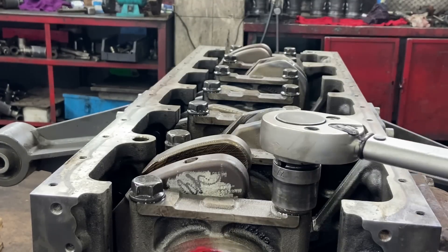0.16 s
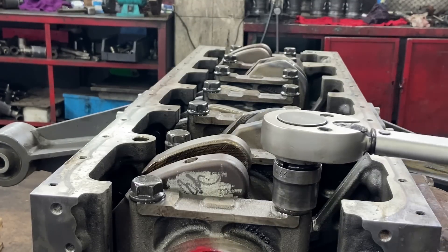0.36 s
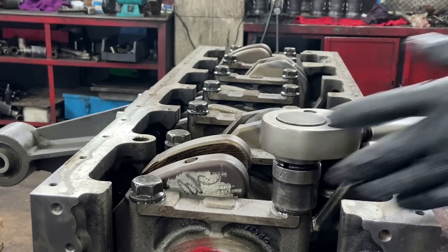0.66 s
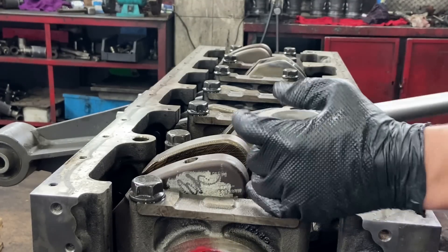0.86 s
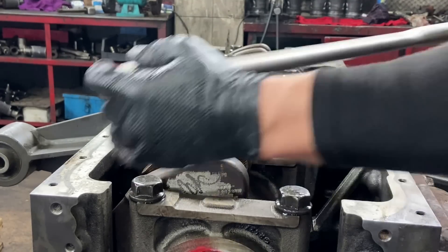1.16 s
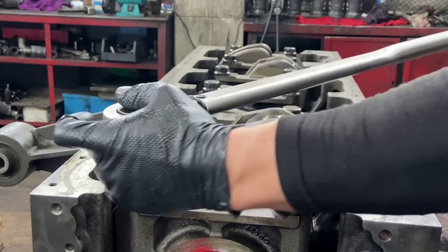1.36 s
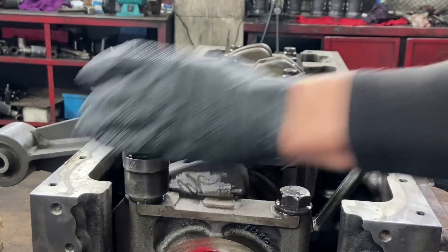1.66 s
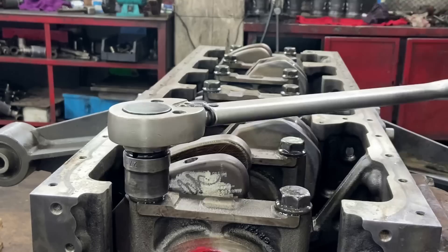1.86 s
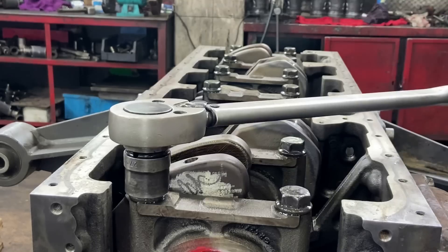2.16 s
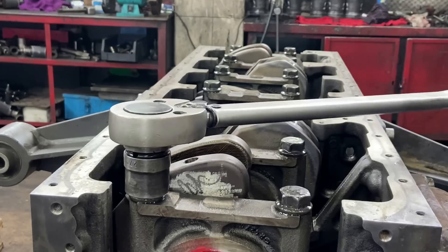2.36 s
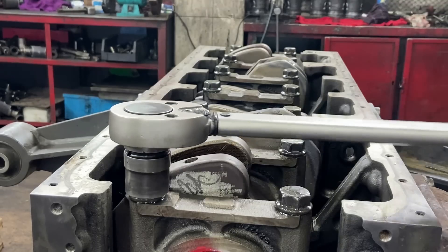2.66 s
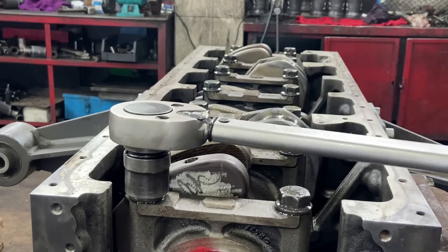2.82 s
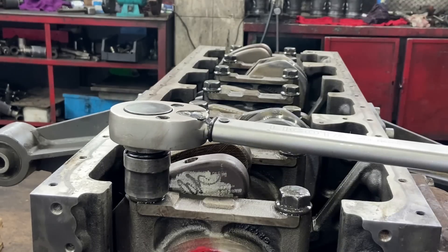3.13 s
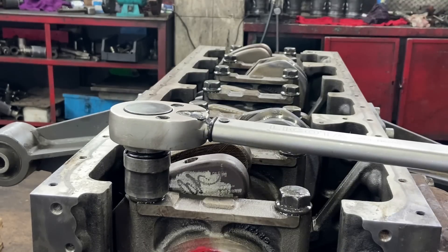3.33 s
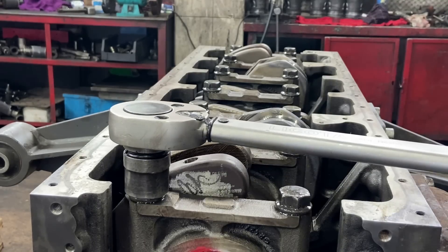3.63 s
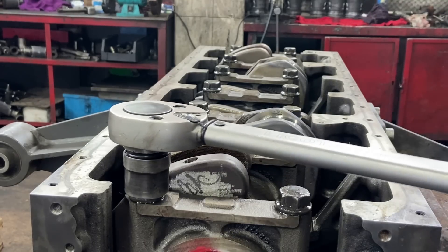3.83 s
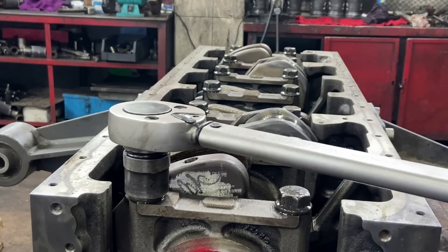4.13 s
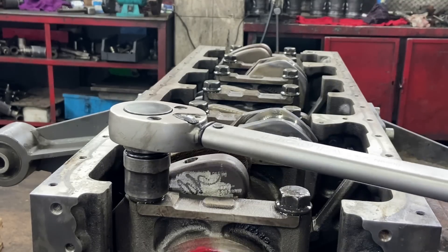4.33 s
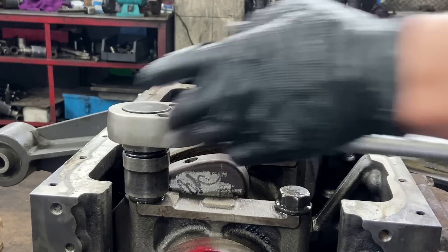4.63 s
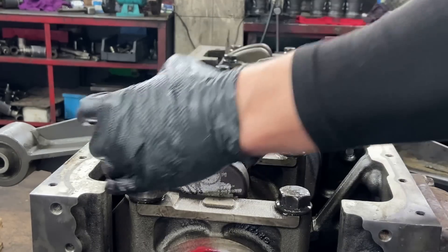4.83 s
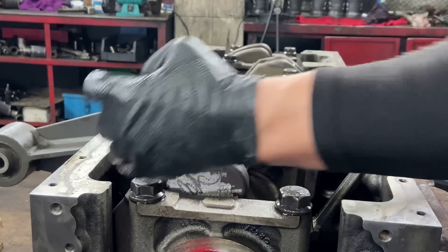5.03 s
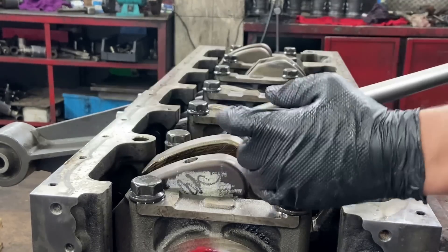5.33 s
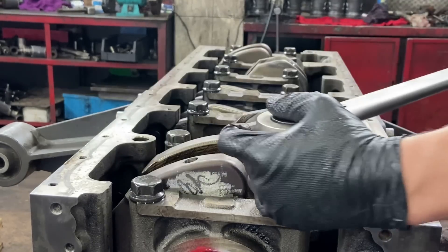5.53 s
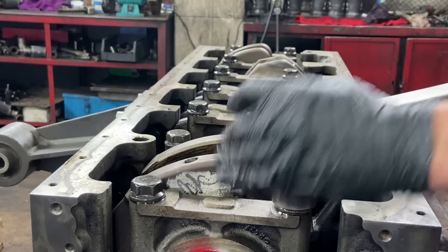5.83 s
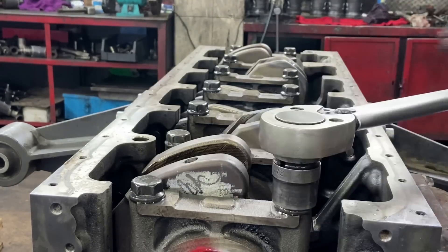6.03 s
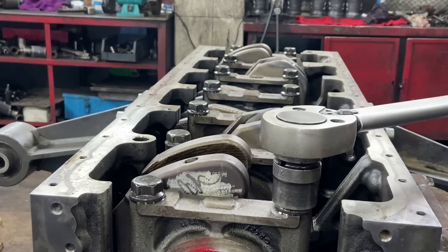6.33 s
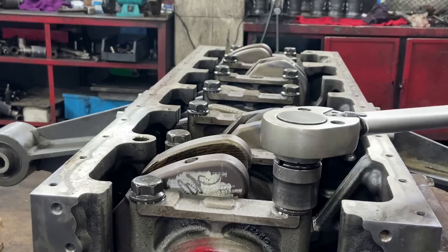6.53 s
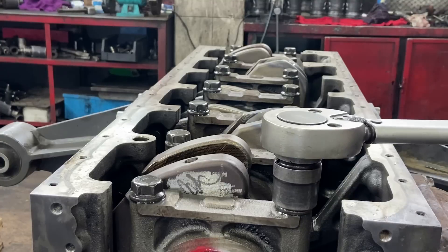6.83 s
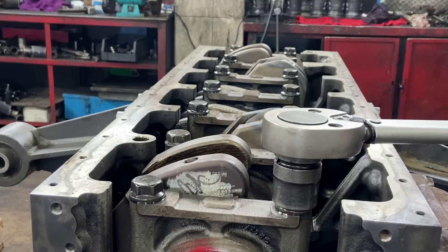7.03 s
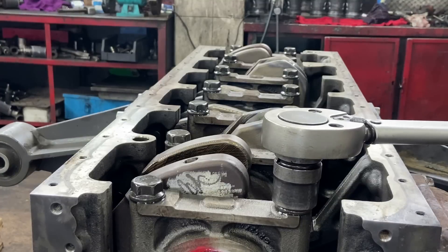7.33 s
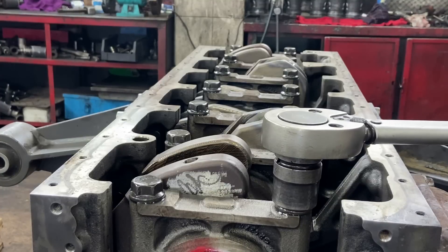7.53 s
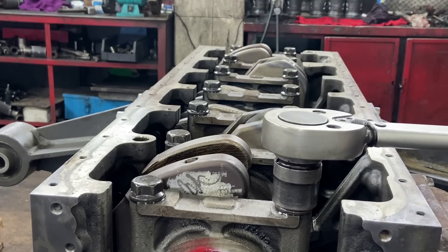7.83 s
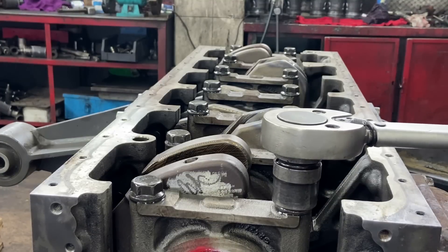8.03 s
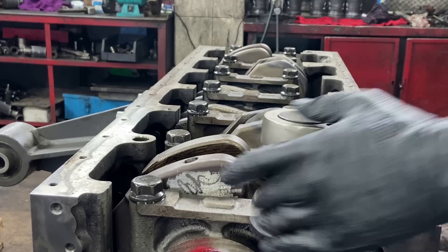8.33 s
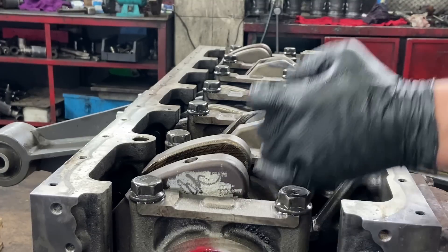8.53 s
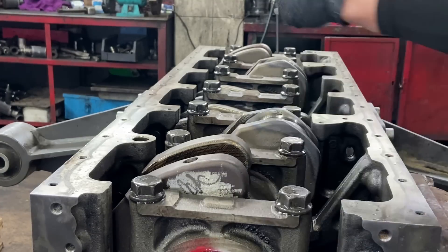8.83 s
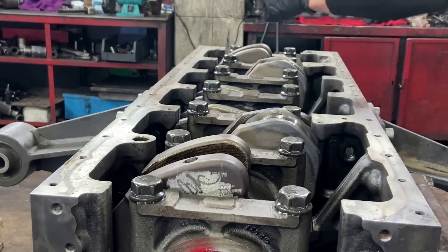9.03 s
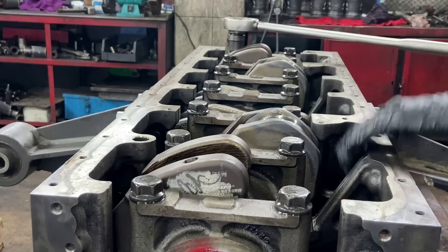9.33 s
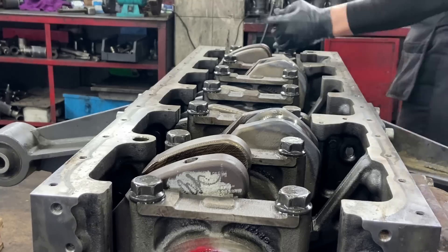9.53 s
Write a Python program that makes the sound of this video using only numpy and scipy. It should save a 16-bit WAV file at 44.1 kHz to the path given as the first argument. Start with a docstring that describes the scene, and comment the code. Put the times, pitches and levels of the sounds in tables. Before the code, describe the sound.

A close, reverberant workshop with low drone and faint hiss. A soft rub opens, then crisp double ratchet ticks at 0.4, 0.55 and 0.75 s. Glove rustle leads to a solid socket clank at 1.25 s, with quick fading bounces and another knock. Quiet handling follows; small dull thumps and scrapes near 3.1 s. The wrench breaks over with a very loud steel clack at 3.85 s and snaps back at 4.2 s, echoes swelling after each. Ratchet ticks and rubs from 4.6 s, a second bouncing socket clank at 5.3 s, lighter knocks to 5.55 s. Near quiet, then block thumps at 7.1, 7.4 and 7.5 s, the strongest with a high steel ping. Louder clacks hit at 7.75 and 8.1 s. Ticks at 8.5 s, a quickening, dulling ratchet spin from 8.7 s with rubbing. At 9.06 s it cuts abruptly to thin air with bright light ticks, clustered around 9.1 and 9.45-9.65 s.

```python
"""Torque wrench on an engine block

A torque wrench tightens two bearing-cap bolts of an engine block in a workshop, close to the microphone.
For each bolt the socket drops on and bounces, the ratchet ticks, the wrench breaks over and snaps back.
Each blow is a short noise burst, coloured by the part it rings; glove rubs, air and a low drone lie around it.
The loud clicks knock the recorder's gain down, so the workshop's echo swells as the gain returns.
At CUT_S the scene cuts to another, thinner one: bright light ticks over thin air."""
import sys
import numpy as np
from scipy import signal
from scipy.fft import rfft, irfft, next_fast_len
from scipy.io import wavfile
from scipy.ndimage import uniform_filter1d

SR = 44100
rng = np.random.default_rng(int(sys.argv[2]) if len(sys.argv) > 2 else 0)


def persist_wave(psi):
    """Save psi, clipped to +-1, as 16-bit WAV."""
    counts = np.round(np.clip(psi, -1, 1) * 32767).astype(np.int16)
    wavfile.write(sys.argv[1], SR, np.atleast_2d(counts).T)


N = 426447
TIME = np.arange(N) / SR  # seconds
CUT_S = 9.06  # the scene cuts to the thinner one

# The socket drops on a bolt head: start_s, level_db, contact_s, bass_db, treble_db,
# bounce_gap_s, first_bounce_db (how far below the drop)
DROPS = [(1.25, -10, .0065, -1, 0, .0288, 15.5), (5.2867, -10.5, .011, -7, 4.5, .033, 10.5)]


def wrench():
    """Socket, toggle and ratchet ring as steel meets steel, and echo in the workshop."""
    # The wrench breaks over at its set torque: start_s, level_db, contact_s, bass_db, treble_db
    break_clicks = [(3.8482, 2, 0.0044, 0, 0), (7.7574, 6, 0.008, -2, -2)]
    # The toggle snaps back: start_s, level_db, contact_s, bass_db, treble_db
    reset_clicks = [(4.2038, 1, 0.0035, 4.5, 1.5), (8.0926, 5.5, 0.006, 0, 0.5)]
    # Colour of each kind of blow: pitch_hz, level_db
    seat_colour = [(100, -23), (240, -16.5), (400, -15.5), (650, -3.5), (900, -8), (1200, -7), (1650, 0.5),
                   (2300, -9), (3500, -11), (5500, -12.5), (7500, -18.5), (10000, -26.5), (15000, -29.5)]
    break_colour = [(60, -11), (150, -3), (420, 1.5), (620, -10.5), (850, -3), (1200, -8.5), (1750, -3.5),
                    (2400, -9), (4500, -13), (7500, -15), (11000, -9.5), (15000, -16)]
    reset_colour = [(60, -8), (150, 0.5), (370, 2.5), (570, -10.5), (800, 0.5), (1400, 0), (2100, -8.5),
                    (3000, -5), (4500, -6.5), (7000, -11), (11000, -9.5), (15000, -21.5)]
    pawl_colour = [(200, -9.5), (600, -16), (900, -3.5), (1700, -1.5), (2800, -2), (4200, -9), (5500, -3.5),
                   (7500, -2), (9500, -9), (11300, -7.5), (15000, -7.5)]
    # Resonances of each struck part, standing out of its colour: pitch_hz, width_hz, lift_db
    block_modes = [(628, 90, 3.5), (1030, 32, 8), (1566, 130, 4), (1850, 170, 2), (2830, 152.5, 4.5),
                   (4830, 120, 2), (5840, 140, 0.5)]
    tube_modes = [(855, 140, 4.7), (1727, 350, 7.8), (3156, 270, 10), (4840, 400, 11.3), (6400, 450, 6.2)]
    toggle_modes = [(1230, 180, 2.6), (1660, 210, 6), (2060, 140, 10), (2590, 200, 6.8), (3750, 96, 3.2),
                    (4300, 100, 4), (6640, 230, 7.4), (11200, 400, 5.1)]
    head_modes = [(1770, 120, 4.7), (2926, 81, 6), (5030, 210, 6.4), (6550, 110, 5), (7480, 176, 3.5),
                  (7300, 160, 2.4), (11000, 310, 4.9)]

    seats, seats_out = blows(socket_blows(), seat_colour, block_modes,
                             after_db=-8, after_t60=0.15, snap=.2, vary_db=3.5)
    breaks, breaks_out = blows(toggle_blows(break_clicks), break_colour, tube_modes,
                               after_db=-7.5, after_t60=0.15, snap=0.73, vary_db=1.5)
    resets, resets_out = blows(toggle_blows(reset_clicks), reset_colour, toggle_modes,
                               after_db=-6.5, after_t60=0.15, snap=0.42, vary_db=4.0)
    pawls, pawls_out = blows(ratchet_blows(), pawl_colour, head_modes,
                             after_db=-8, after_t60=0.17, snap=0.38, vary_db=4.5)
    direct = nearby(seats + breaks + resets + pawls, side_db=-15)
    into_room = amp(0.3) * seats_out + amp(-6.7) * breaks_out
    into_room = into_room + amp(-8.2) * resets_out + amp(-1.) * pawls_out
    return direct + room(into_room, wet_db=-12.5)


def toggle_blows(rows):
    """A faint, dull noise leads into each loud click."""
    lead_s, lead_db, bass_db, treble_db = .011, -35, -9, -22  # lead_s is also its contact time
    return rows + [(s - lead_s, lead_db, lead_s, bass_db, treble_db) for s, *_ in rows]


def socket_blows(count=4):
    """Each drop is followed by evenly spaced, fading bounces on both rims; softer blows sound duller."""
    # The socket knocks on the bolt head or slips home: start_s, level_db
    knocks = [(0.1282, -35), (0.8292, -39.5), (1.3392, -21.5), (4.9612, -43), (5.4512, -34), (5.4892, -24),
              (8.513, -36.5)]
    knock_contact_s, knock_bass_db, soft_treble_db = .007, 8, -7
    bounce_loss_db, bounce_contact_s = 3.4, .003  # each bounce is weaker than the last
    rim_s, rim_db = .007, -8  # the other rim touches at most this much later, and softer

    def softness_bass_db(db):
        """Softer blows gain bass: .85 dB for each dB below -25.5 dB."""
        return .85 * (-25.5 - db)

    rows = [(s, db, knock_contact_s, knock_bass_db + softness_bass_db(db), soft_treble_db)
            for s, db in knocks]
    for s, db, contact_s, bass_db, treble_db, gap_s, below_db in DROPS:
        rows.append((s, db, contact_s, bass_db, treble_db))
        for k, rim_share in enumerate(rng.uniform(.5, 1, count)):
            at_s = s + (k + 1) * gap_s
            bounce_db = db - below_db - k * bounce_loss_db
            dull_db = softness_bass_db(bounce_db)
            rows.append((at_s, bounce_db, bounce_contact_s, dull_db, soft_treble_db))
            rim_at_s = at_s + rim_share * rim_s
            rows.append((rim_at_s, bounce_db + rim_db, knock_contact_s, dull_db, soft_treble_db))
    return rows


def ratchet_blows(count=5):
    """Play is taken up with a light tick, then the pawl drops; one quickening spin runs over count teeth."""
    # Double ticks: start_s, level_db, lead_s (of the light tick), bass_db, treble_db
    pawl_drops = [(0.401, -18, .0205, -2, 4), (0.5432, -20.5, .023, 0, 0), (0.7432, -23.5, .0274, -3, 3),
                  (2.0765, -42, .01, 7, -7.5), (4.6365, -41.5, .003, 3, -6.5), (4.8147, -24, .035, 8, -1.5),
                  (5.0385, -25.5, .007, 5, -1), (5.5618, -25.5, .002, -2.5, -2.5),
                  (8.544, -27.5, .013, -3, -4.5), (8.9416, -28, .002, -1, -2.5)]
    light_db, pawl_contact_s = -7.0, .004
    rows = []
    for s, db, lead_s, bass_db, treble_db in pawl_drops:
        rows.append((s - lead_s, db + light_db, pawl_contact_s, bass_db, treble_db))
        rows.append((s, db, pawl_contact_s, bass_db, treble_db))

    # The ratchet is spun back, faster and faster
    s, gap_s, quicken_s = 8.7296, .0482, .0045
    spin_db, spin_contact_s, spin_bass_db, spin_treble_db = -25.5, .008, -4, 2.5
    fade_db, dull_db = .9, 2.3  # per tooth
    for k in range(count):
        rows.append((s, spin_db - k * fade_db, spin_contact_s, spin_bass_db, spin_treble_db - k * dull_db))
        s += gap_s - k * quicken_s
    return rows


def bench():
    """Dull, booming thumps and thuds under the block, and the steel ping that they set off."""
    # Colour of a thump: pitch_hz, level_db
    thump_colour = [(50, -14), (100, -6), (170, 3), (300, 2.5), (480, -3.5), (650, -2.5), (900, -10.5),
                    (1130, -10), (1600, -15), (3000, -22), (7000, -27.5), (15000, -31)]
    # Resonances of the bench: pitch_hz, width_hz, lift_db
    bench_modes = [(150, 50, 3), (231, 24, 4), (269, 26, 3), (370, 120, 1.5), (690, 190, 5.5),
                   (1120, 110, 5)]
    thumps, thumps_out = blows(bench_blows(), thump_colour, bench_modes, after_db=-6.5, after_t60=0.13,
                               snap=0.12, vary_db=1.5, bass_hz=248.3, treble_hz=1116)
    direct = amp(-1.5) * nearby(thumps, side_db=-10)
    return direct + room(thumps_out, wet_db=-6) + nearby(ping(), side_db=-12) + thuds()


def bench_blows(count=3):
    """The block slips a little under the pull, thumps, and rocks to rest with weaker and weaker repeats."""
    # Thumps, levels before the bench mix: start_s, level_db, bass_db, treble_db
    shifts = [(3.064, -35, 7, 13), (3.118, -39, 14, 5), (7.098, -34, 9, 9), (7.402, -18.5, -2.5, -1),
              (7.522, -22, -11, -12)]
    contact_s, rock_gap_s, rock_loss_db = .011, .031, 8
    slip_s, slip_db = .005, -15  # slip_s is both its lead and its contact time
    rows = []
    for s, db, bass_db, treble_db in shifts:
        rows.append((s - slip_s, db + slip_db, slip_s, bass_db, treble_db))
        for k in range(count):
            rows.append((s + k * rock_gap_s, db - k * rock_loss_db, contact_s, bass_db, treble_db))
    return rows


def thuds():
    """The whole block nods once on its stand: its lowest mode, heavily damped."""
    # Nods of the block: start_s, level_db (where the decay starts)
    nods = [(3.112, -31), (3.851, -19), (4.206, -15)]
    pitch_hz, t60_s = 88, .15
    out, t = np.zeros(N), TIME[:SR]
    for s, db in nods:
        add(out, s, amp(db - 60 * t / t60_s) * np.sin(2 * np.pi * pitch_hz * t))
    return out


def ping():
    """The hardest thump sets off a few pure steel modes that ring on; a close pair beats."""
    # Steel modes: pitch_hz, level_db, t60_s (time to fall by 60 dB)
    steel_modes = [(2595, -42, .75), (2620, -42.5, .65), (4134, -50, .4), (6772, -31.5, .65),
                   (6790, -34, .45), (9878, -37, .35), (9970, -30, .28), (12590, -38, .45)]
    out, t = np.zeros(N), TIME[:SR]
    for hz, db, t60_s in steel_modes:
        add(out, 7.401, amp(db - 60 * t / t60_s) * np.sin(2 * np.pi * hz * t))
    return out


def rubs(grain_db=2.5):
    """Glove, sleeve and socket rub and scrape: they slip in tiny grains under a swelling stroke."""
    # Strokes: start_s, length_s, level_db (before the swell), centre_hz, width_octaves
    strokes = [(0.001, 0.29, -51, 1500, 1.6), (0.911, 0.055, -45, 1600, 0.51), (1.101, .16, -42, 2600, 1.2),
               (1.107, .16, -46, 270, 1.0), (1.917, 0.18, -48, 790, 1.55), (2.902, 0.14, -48, 4200, 0.78),
               (3.058, 0.058, -40.5, 2000, 1.33), (3.243, 0.071, -51, 900, 1.4),
               (4.675, .12, -48, 5250, .3), (4.69, .11, -46, 1330, .3), (4.68, .13, -47, 230, .7),
               (2.32, .12, -54, 260, .7), (3.65, .06, -50, 250, .8), (6.21, .08, -55, 3400, .5),
               (6.955, .05, -53, 2800, .9), (7.073, 0.062, -43.5, 1200, 1.53),
               (7.169, .07, -53.5, 3050, 0.3), (8.502, 0.042, -38.5, 1480, .7),
               (8.731, 0.29, -41.5, 2100, 1.1)]
    out = np.zeros(N)
    hz = np.fft.rfftfreq(SR, 1 / SR) + 1
    for s, length_s, db, centre_hz, octaves in strokes:
        n = int(length_s * SR)
        grain_levels = np.repeat(rng.standard_normal(SR // 100), 100)  # a new level every 100 samples
        grains = rng.standard_normal(SR) * amp(grain_db * grain_levels)
        band = np.exp(-.5 * (np.log2(hz / centre_hz) / octaves) ** 2)
        stroke = irfft(rfft(grains) * band)[:n]
        add(out, s, amp(db) * unit(stroke) * signal.windows.tukey(n, .85))
    return out


def thin_scene():
    """Bright, light ticks, each a short coloured noise burst, over thin air with little bass."""
    # Ticks: start_s, level_db, bass_db, treble_db
    thin_ticks = [(9.1081, -35, 2, 9), (9.124, -33, 6, 2), (9.1974, -45, 8, -3), (9.4385, -29, -18, -6),
                  (9.4542, -24, -22, 9), (9.57, -26.5, 8, 3), (9.5964, -36, 18, -3), (9.6409, -27, 7, -0.5)]
    # Colour of the ticks, and of the air there: pitch_hz, level_db
    thin_colour = [(200, -35), (350, -26), (600, 1.5), (1100, -8), (1700, -15), (2600, -9.5), (4000, -12),
                   (5200, -8), (8500, -12.5), (12000, -4.5), (15500, -6.5)]
    thin_air = [(60, -43), (200, -30), (330, -11.5), (550, 6.5), (900, -6), (1600, -11), (3000, -14),
                (6000, -21), (12000, -22), (15500, -28)]
    contact_s = .003
    rows = [(s, db, contact_s, bass_db, treble_db) for s, db, bass_db, treble_db in thin_ticks]
    ticks, ticks_out = blows(rows, thin_colour, [], after_db=-6, after_t60=.05, snap=0.71, vary_db=4.0)
    return nearby(ticks, side_db=-9) + room(ticks_out, wet_db=-10) + air(thin_air, -50.5)


def rumble():
    """A slowly fading low drone, and a boom that swells and dies after each drop of the socket."""
    # Colour of the drone and boom: pitch_hz, level_db
    rumble_colour = [(25, -21.5), (40, -11.5), (53, 3.5), (75, -2.5), (110, -17), (300, -43), (2000, -89)]
    drone_db, fade_db_per_s = -50.5, 1.2
    boom_db, boom_rise_s = -44.5, .21  # peak of the boom, and the time to reach it
    power = amp(drone_db - fade_db_per_s * TIME) ** 2
    for s, *_ in DROPS:
        age = np.maximum(TIME - s, 0) / boom_rise_s
        power = power + amp(boom_db) ** 2 * age * np.exp((1 - age ** 2) / 2)
    return air(rumble_colour, 0) * np.sqrt(power)


def close_air():
    """The workshop air around the close work is a steady hiss over a low hum of noise."""
    # Colour of the air: pitch_hz, level_db
    air_colour = [(25, -30.5), (38, -10.5), (52, 0), (75, -3.5), (110, -15.5), (200, -16), (400, -19.5),
                  (800, -23.5), (1600, -28), (3000, -27.5), (5000, -23.5), (7000, -24), (11000, -25.5),
                  (15000, -23)]
    return air(air_colour, -48)


def air(colour, db):
    """Steady diffuse noise of the given colour, thinned out towards the lowest bass."""
    hz, z = noise_pair(size=next_fast_len(N, real=True))
    return amp(db) * unit(irfft(z * amp(read(colour, hz)) * hz / (hz + 20))[:, :N])


def blows(rows, colour, modes, after_db, after_t60, snap, vary_db, bass_hz=750, treble_hz=5000):
    """Each contact rings the struck part, towards the microphone and, more smoothly, into the room.

    Each row: start_s, level_db, contact_s, bass_db, treble_db."""
    hz = np.fft.rfftfreq(8192, 1 / SR)
    body_db = read(colour, hz)
    for mode_hz, width_hz, lift_db in modes:
        body_db = body_db + lift_db / (1 + (2 * (hz - mode_hz) / width_hz) ** 2)
    # The sound falls away below the lowest point of the colour
    body_db = body_db - 20 * np.log10(1 + (colour[0][0] / 2 / (hz + 10)) ** 2)
    bass = 1 / (1 + (hz / bass_hz) ** 4)
    treble = 1 - 1 / (1 + (hz / treble_hz) ** 4)
    grid = np.arange(0, SR / 2, 110)
    direct, spread = np.zeros((2, N))
    for s, db, contact_s, bass_db, treble_db in rows:
        hit_db = body_db + bass_db * bass + treble_db * treble
        # Each spot favours other small modes; over all directions they even out
        spot_db = vary_db * (1 - bass) * np.interp(hz, grid, rng.standard_normal(len(grid)))
        burst = chatter(contact_s, after_db, after_t60, snap)
        hit = signal.fftconvolve(burst, causal(hit_db + spot_db))
        all_round = causal(hit_db)
        size = amp(db) * np.sqrt(SR / 10 / 10)  # level = energy spread over 10 ms
        add(direct, s, size * hit / np.linalg.norm(hit))
        add(spread, s, size * all_round / np.linalg.norm(all_round))
    return direct, spread


def chatter(contact_s, after_db, after_t60, snap, size=4096):
    """Steel faces snap together and chatter for a few ms; an after-ring runs through the metal around them."""
    t, hz = np.arange(size) / SR, np.fft.rfftfreq(size, 1 / SR)
    shape = np.exp(-(t / max(contact_s, .0005)) ** 2) + amp(after_db - 60 * t / after_t60)
    z = rfft(rng.standard_normal(size) * shape)
    even = irfft(z / (abs(z) + 1e-9) ** 0.65)  # a hard contact feeds all frequencies more alike
    body = rfft(unit(even * np.minimum(1, 3 * shape)))
    crack = rfft(unit(rng.standard_normal(size) * np.exp(-(t / 0.0014) ** 2)))
    # Part of the treble is spent in the first snap
    share = np.clip(snap, 0, .95) * hz ** 4 / (hz ** 4 + 4500 ** 4)
    return irfft(body * np.sqrt(1 - share) + crack * np.sqrt(share))[:size * 3 // 4]


def nearby(x, side_db, t60=0.017):
    """Quick reflections off the block reach the two microphones differently."""
    # How much the two sides differ: pitch_hz, level_db
    side_colour = [(200, 0), (600, 4), (1100, 6), (2200, 0), (8000, 1)]
    t = TIME[:2048]
    taps = rng.standard_normal(len(t)) * amp(-60 * t / t60)
    colour = causal(read(side_colour, np.fft.rfftfreq(len(t), 1 / SR)))
    reflections = signal.fftconvolve(taps / np.linalg.norm(taps), colour)
    side = amp(side_db) * signal.oaconvolve(x, reflections)[:N]
    return np.array([x + side, x - side])


def room(x, wet_db, build=0.0027):
    """Diffuse workshop tail that builds up, then dies faster in the high treble."""
    # Echo time: pitch_hz, t60_s (time to fall by 60 dB)
    room_t60 = [(100, 0.7), (400, 0.9), (1600, 1.08), (4000, 1.03), (8000, 0.86), (15000, 0.42)]
    _, z = noise_pair(size=SR)
    hz, t, z = signal.stft(irfft(z), SR, nperseg=256)
    fading = z * amp(-60 * t / read(room_t60, hz)[:, None])
    tail = signal.istft(fading, SR, nperseg=256)[1][:, :SR]
    tail = tail * (1 - np.exp(-(TIME[:SR] / build) ** 2))
    tail = tail / np.linalg.norm(tail[0])
    return amp(wet_db) * signal.fftconvolve(x[None], tail, axes=1)[:, :N]


def noise_pair(size):
    """Spectra of diffuse noise at the two microphones, partly alike, and their frequencies."""
    # How alike left and right are: pitch_hz, correlation (1 = the same)
    likeness = [(60, 1), (280, 0.88), (650, 0.2), (1400, .3), (2500, 1), (6500, 1), (8000, 1), (15000, 1)]
    hz = np.fft.rfftfreq(size, 1 / SR)
    a, b = rfft(rng.standard_normal((2, size)))
    same = np.clip(read(likeness, hz), -1, 1)
    mid, side = a * np.sqrt((1 + same) / 2), b * np.sqrt((1 - same) / 2)
    return hz, np.array([mid + side, mid - side])


def stereo_phase(pair):
    """Stereo processing turns the right side's phase further ahead in the high treble."""
    # How far the right side leads: pitch_hz, phase_radians
    treble_phase = [(7000, 0), (7700, .3), (9100, 3.14), (11200, 6.28), (13350, 9.42), (15200, 12.57)]
    size = next_fast_len(N, real=True)
    phase = np.interp(np.fft.rfftfreq(size, 1 / SR), *np.transpose(treble_phase))
    right = irfft(rfft(pair[1], size) * np.exp(1j * phase), size)[:N]
    return np.array([pair[0], right])


def gain_control(x):
    """A very loud click knocks the gain down at once; it climbs back at a steady rate."""
    threshold_db, max_duck_db, recover_db_per_s = -7, 17.5, 82
    slope = 3  # dB of ducking per dB over the threshold
    power = uniform_filter1d((x ** 2).mean(0), size=441, origin=130)  # 10 ms, looking 2 ms ahead
    level_db = 10 * np.log10(abs(power) + 1e-12)
    duck_db = np.clip(slope * (level_db - threshold_db), 0, max_duck_db)
    climb_db = recover_db_per_s * TIME
    return x * amp(climb_db - np.maximum.accumulate(duck_db + climb_db))


def amp(db):
    """Decibels to gain."""
    return 10 ** (np.asarray(db) / 20)


def unit(x):
    """Scales to rms 1."""
    return x / np.sqrt(np.mean(x ** 2) + 1e-20)


def read(points, hz):
    """Reads a spectrum on a log-frequency axis."""
    f, value = np.transpose(points)
    return np.interp(np.log(hz + 1), np.log(f), value)


def add(mix, s, sound):
    """Mixes a sound in at time s."""
    part = mix[max(round(s * SR), 0):][:len(sound)]
    part += sound[:len(part)]


def causal(db, size=4096):
    """Impulse response with this gain curve and no ringing ahead of the blow."""
    log_gain = np.log(amp(np.r_[db, db[-2:0:-1]]))
    return np.fft.ifft(np.exp(np.conj(signal.hilbert(log_gain)))).real[:size]


def scene():
    """The close work on the two bolts, then a cut to the thinner scene."""
    handling = rubs()
    handling_echo = room(handling, wet_db=-7)
    close = stereo_phase(wrench() + bench() + handling + handling_echo + close_air() + rumble())
    after = np.clip((TIME - CUT_S) / .01 + .5, 0, 1)  # crossfade over 10 ms
    return close * (1 - after) + thin_scene() * after


def record(dry):
    """The recorder rides the gain, rounds off the highest peaks, then limits the band."""
    edge_hz = 16100
    ridden = gain_control(dry)
    rounded = ridden / (1 + (ridden / .9) ** 8) ** (1 / 8)
    lowpass = signal.firwin(255, edge_hz, window=("kaiser", 8), fs=SR)
    return signal.oaconvolve(rounded, lowpass[None], "same")


dry = scene()
out = record(dry)
persist_wave(out)
```